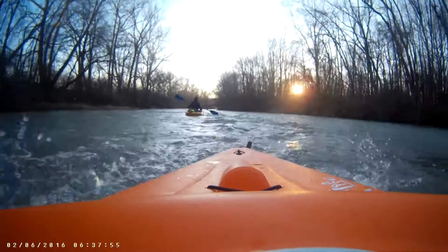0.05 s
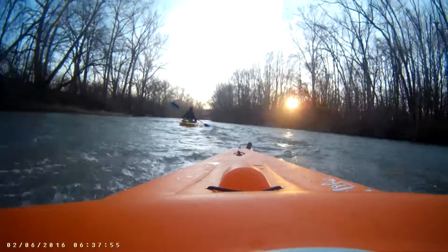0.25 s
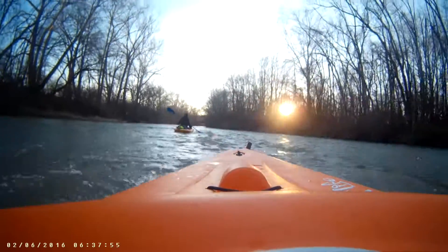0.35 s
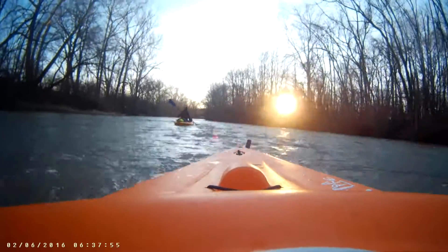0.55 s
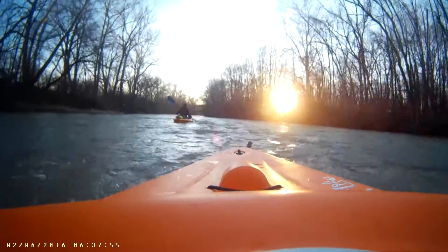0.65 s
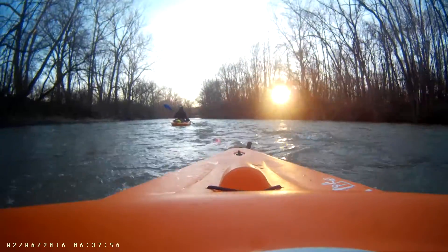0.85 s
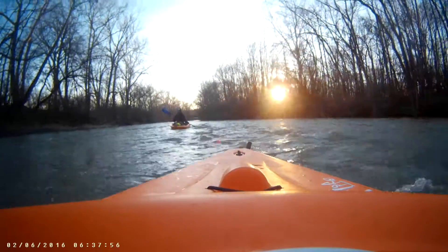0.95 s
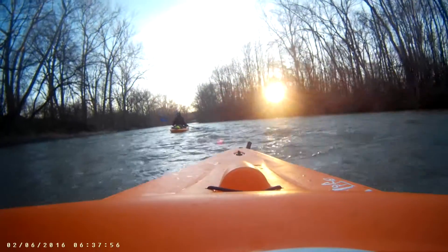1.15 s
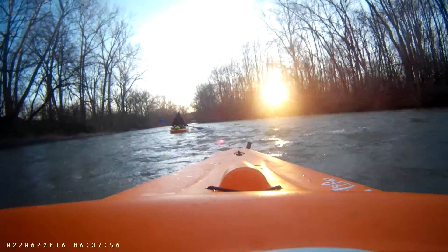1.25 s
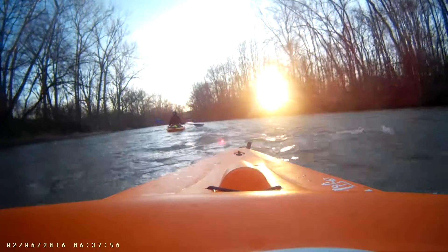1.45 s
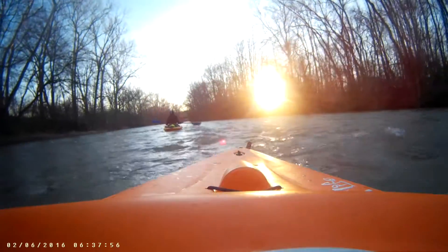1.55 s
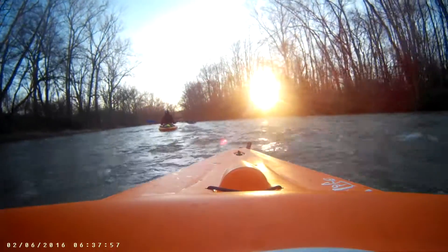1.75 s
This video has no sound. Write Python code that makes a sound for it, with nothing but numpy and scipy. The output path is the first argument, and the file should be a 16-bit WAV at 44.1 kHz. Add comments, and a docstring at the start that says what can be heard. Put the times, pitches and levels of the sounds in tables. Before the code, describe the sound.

A plastic kayak hull knocks and cracks against rocks in a shallow river. Water washes up the bow first, spray taps close to the deck microphone, then small bubbly laps follow over low wind rumble.

```python
"""Kayak in a shallow rapid

A plastic kayak runs a rapid, heard from a camera on its deck. A wave washes up the bow, the hull
knocks, cracks and shudders on rocks, and spray taps on the camera case. Then the water calms to
a few small, bubbly laps, over low wind and a faint electrical whine."""
import sys
import numpy as np
from scipy import signal
from scipy.fft import rfft, irfft, next_fast_len
from scipy.io import wavfile
from scipy.ndimage import map_coordinates

SR = 44100
rng = np.random.default_rng(int(sys.argv[2]) if len(sys.argv) > 2 else 0)


def wav_out(sig):
    """Save sig, one row per channel (or a flat mono array), as 16-bit PCM at SR to the path in sys.argv[1]."""
    wavfile.write(sys.argv[1], SR, np.round(np.clip(np.atleast_2d(sig).T, -1, 1) * 32767).astype(np.int16))


N = 79380
T = np.arange(N) / SR


def amp(db):
    """Turn decibels into a gain."""
    return 10 ** (np.asarray(db) / 20)


def unit(x):
    """Scale a signal to an average strength (rms) of 1."""
    return x / np.sqrt(np.mean(x ** 2) + 1e-20)


def level(rows):
    """Join (t/s, level/dB) points into a gain for every sample."""
    return amp(np.interp(T, *np.transpose(rows)))


def wobble(rate):
    """A smooth curve through `rate` random points a second."""
    return map_coordinates(rng.standard_normal(N), [T * rate])


def response(tone, cutoff_hz=1e6, order=2, size=8192):
    """A click shaped by a tone table (how strong each frequency is), dulled above the cutoff."""
    hz = np.fft.rfftfreq(size, 1 / SR)
    tone_hz, tone_db = np.transpose(tone)
    gain = amp(np.interp(np.log(hz + 1), np.log(tone_hz), tone_db))
    gain /= np.sqrt(1 + (hz / cutoff_hz) ** (2 * order))
    # minimum phase: all the ringing comes after the click
    cepstrum = irfft(np.log(gain + 1e-6))
    cepstrum[1:size // 2] *= 2
    cepstrum[size // 2 + 1:] = 0
    return irfft(np.exp(rfft(cepstrum)))


def shaped(x, tone):
    """Filter x with a tone table, at strength 1."""
    lead_in = SR // 4
    filtered = signal.fftconvolve(np.pad(x, (lead_in, 0), "wrap"), response(tone))
    return unit(filtered[lead_in:][:N])


def noise(tone):
    """Steady noise with the given tone."""
    return shaped(rng.standard_normal(N), tone)


def add(out, start_s, x):
    """Mix x into out at a given time."""
    part = out[max(0, round(start_s * SR)):][:len(x)]
    part += x[:len(part)]


# tone of the hiss (f/Hz, level/dB)
HISS_TONE = [(100, 6.5), (8000, 5), (14000, 7), (16000, -31.5)]
# loudness of the whine, dipping during the blows (t/s, level/dB)
WHINE_LEVELS = [(0, -68.5), (.35, -64), (.38, -79), (.65, -66), (.95, -68.5), (1.2, -80), (1.8, -77)]
def hiss_and_whine(hiss_db=-69.5, whine_hz=9519, flutter_hz=36.4, flutter_rad=0.65):
    """Faint hiss and a thin electrical whine that flutters quickly."""
    flutter = flutter_rad * signal.square(2 * np.pi * flutter_hz * T)
    whine = unit(np.sin(2 * np.pi * whine_hz * T + flutter))
    return amp(hiss_db) * noise(HISS_TONE) + level(WHINE_LEVELS) * whine


# loudness of the wind and the swaying hull (t/s, level/dB)
WIND_LEVELS = [(0, -34), (.06, -43.5), (.16, -60), (.3, -32.5), (.42, -27), (.62, -27.5), (.85, -34),
               (1.0, -47.5), (1.2, -59), (1.39, -50), (1.45, -50), (1.6, -59.5), (1.8, -65)]
# tone of their rumble (f/Hz, level/dB)
WIND_TONE = [(10, -30.5), (24, 1.5), (44, 4.5), (70, -12), (200, -27.5), (900, -120)]
def wind():
    """The hull sways in the wind with a deep rumble."""
    return level(WIND_LEVELS) * noise(WIND_TONE)


# loudness of the hollow hull (t/s, level/dB)
BOOM_LEVELS = [(0, -38), (.13, -50), (.23, -31), (.34, -30), (.41, -29), (.52, -28), (.7, -39.5),
               (.88, -46), (.94, -35), (1.0, -52), (1.35, -66.5), (1.42, -50.5), (1.5, -63), (1.8, -68.5)]
# tone of the hollow hull (f/Hz, level/dB)
BOOM_TONE = [(60, -21.5), (105, -8), (132, -0.5), (185, -11), (250, -7.5), (400, -30.5), (2500, -120)]
# heaves of the hull (t/s, level/dB, length/s)
HULL_HEAVES = [(0.381, -14, 0.025), (0.408, -13, 0.025), (.473, -15, 0.0203), (0.7216, -18, 0.0233)]
def hollow_hull():
    """The hull booms like a drum and heaves under the blows, pulling in, then pushing out."""
    out = level(BOOM_LEVELS) * noise(BOOM_TONE)
    for start_s, db, length_s in HULL_HEAVES:
        progress = np.clip((T - start_s) / length_s, 0, 1)
        out -= amp(db) * np.sin(2 * np.pi * progress) * np.sin(np.pi * progress)
    return out


def churn(tone, rate, rush):
    """Tiny splashes, about `rate` a second, over a smooth rush of water."""
    splashes = (rng.random(N) < rate / SR) * rng.standard_normal(N)
    return shaped(unit(splashes) + rush * rng.standard_normal(N), tone)


# loudness of the foam (t/s, level/dB)
FOAM_LEVELS = [(0, -61), (.13, -63.5), (.45, -59), (.9, -70.5), (1.0, -61.5), (1.11, -65), (1.2, -77.5),
               (1.8, -81)]
# tone of the foam (f/Hz, level/dB)
FOAM_TONE = [(1500, -11), (4200, -3.5), (5500, -5), (7300, -5), (8500, -15.5), (15000, -15.5)]
def foam(flicker_db=1.9):
    """Foam makes a high, flickering fizz."""
    return level(FOAM_LEVELS) * amp(flicker_db * wobble(140)) * churn(FOAM_TONE, rate=5000, rush=3.0)


# loudness of the rushing water (t/s, level/dB)
WASH_LEVELS = [(0, -37), (.062, -31.5), (.115, -44.5), (.123, -38.5), (.185, -35), (.232, -23.5),
               (.275, -27.5), (.4, -33.5), (.5, -28), (.6, -33.5), (.72, -39.5), (.92, -38.5), (.99, -51.5),
               (1.19, -64.5), (1.3, -53.5), (1.48, -63), (1.8, -61)]
# tone of the wash and the laps (f/Hz, level/dB)
WATER_TONE = [(90, -27.5), (250, -7.5), (320, -5), (430, 5), (560, -1), (800, -9.5), (950, 1.5),
              (1050, -14.5), (1230, -2.5), (1420, -1), (1690, 1), (2100, -19), (2550, -21), (3000, -32),
              (3600, -23), (4100, -26.5), (4500, -64), (15000, -76)]
def wash(surge_db=1.5):
    """Water rushes along the hull in uneven surges."""
    return level(WASH_LEVELS) * amp(surge_db * wobble(69.6)) * churn(WATER_TONE, rate=2200, rush=0.96)


def bubble_cloud(hz, middle_s, spread=0.056, cycles=46, rise=0.032, reach_s=0.09, count=40):
    """Bubbles near one pitch and one moment; each rings briefly and rises a little as it fades."""
    out = np.zeros(N + SR)
    for k, (shift, size, tune) in enumerate(rng.random((count, 3))):
        pitch = hz * np.exp(2 * spread * (2 * tune - 1))
        age = T[:int(SR * cycles / pitch)] * pitch / cycles  # runs from 0 to 1
        ring = np.sin(2 * np.pi * cycles * age * (1 + rise * age))
        fade = amp(-40 * age) * (1 - np.exp(-age * cycles))
        start_s = middle_s + reach_s * (2 * (k + shift) / count - 1)
        add(out, start_s, (0.5 + size) * ring * fade)
    return out[:N] * np.sqrt(2 * reach_s * SR) / np.linalg.norm(out)


# small waves (loudest at t/s, level/dB, rise/s, fall/s, bubble f/Hz, bubbles over splash/dB)
BOW_LAPS = [(.123, -34, 0.0039, 0.021, 1490, 0.5), (.191, -30.5, 0.0048, 0.058, 1592, -0.5),
            (.881, -33.5, 0.00097, 0.034, 1280, -1), (1.04, -47, 0.022, 0.014, 419, 5.5),
            (1.094, -51, 0.039, 0.032, 328.3, 6.5), (1.321, -45.5, 0.003, 0.0096, 2080, 5),
            (1.332, -37.5, 0.01, 0.013, 1533, -0.5), (1.408, -61, 0.017, 0.012, 3590, 2.5),
            (1.414, -43.5, 0.011, 0.014, 2534, -3.5), (1.491, -51.5, .002, 0.0047, 3590, -5.5),
            (1.592, -53, 0.028, 0.029, 697, -9.5), (1.689, -55.5, 0.0065, 0.0078, 1680, 10.5),
            (1.701, -49, 0.0047, 0.0084, 1382, 9.5), (1.749, -47.5, 0.011, 0.019, 1654, -1),
            (1.799, -54.5, 0.0077, .01, 1365, 5)]
def laps():
    """Small waves slap the bow; each is a splash with bubbles that swells and fades."""
    out = np.zeros(N)
    for top_s, db, rise_s, fall_s, hz, bubble_db in BOW_LAPS:
        from_top = np.where(T < top_s, (top_s - T) / rise_s, (T - top_s) / fall_s)
        swell = np.exp(-from_top ** 1.31)
        splash = churn(WATER_TONE, rate=920, rush=0.73)
        out += amp(db) * swell * (splash + amp(bubble_db) * bubble_cloud(hz, top_s))
    return out


# loudness of the fine ticking (t/s, level/dB)
TICK_LEVELS = [(.26, -76), (.295, -48), (.34, -52.5), (.37, -31.5), (.41, -28.5), (.44, -61), (.46, -41),
               (.56, -59), (.8, -74)]
# tone of the ticks (f/Hz, level/dB)
TICK_TONE = [(800, 3), (2300, -1), (3700, -1), (4600, -11.5), (7200, -8.5), (8300, -13.5), (16000, -45)]
def ticking(rate=300, clump_db=4, clump_rate=130):
    """Fine spray and grit tick on the hull in clumps, loudest while it scrapes over rock."""
    chance, size = rng.random((2, N))
    ticks = (chance < rate / SR) * size * amp(clump_db * wobble(clump_rate))
    return level(TICK_LEVELS) * shaped(ticks, TICK_TONE)


def strike(tone, cutoff_hz, grit, grit_s, ring, ring_s, order=2, ring_hz=2000):
    """One hit: a push, a short gritty crunch and a duller ring. Harder hits have a higher cutoff."""
    t = T[:SR // 10]
    fades = amp(-60 * t / np.array([[grit_s], [ring_s]]))
    attack = 1 - np.exp(-t / 0.00077)
    crunch, tail = rng.standard_normal((2, len(t))) * fades * attack
    dull_tail = signal.lfilter(*signal.butter(2, ring_hz, fs=SR), tail / np.linalg.norm(tail))
    force = grit * crunch / np.linalg.norm(crunch) + ring * dull_tail
    force[0] += 1  # the push
    body = response(tone, cutoff_hz, order)
    hit = signal.fftconvolve(force, body)
    hit *= np.linalg.norm(body) / np.linalg.norm(hit) * np.sqrt(1 + grit ** 2 + ring ** 2)
    return hit / abs(body).max()  # peaks near 1


# drops landing (t/s, relative level/dB)
SPRAY_DROPS = [(0.2972, -42), (0.3023, -22), (0.3644, -5.5), (0.406, -6), (0.462, -14.5), (0.5144, -23),
               (0.5771, -21.5), (0.6409, -16), (0.6998, -18), (0.7396, -19), (0.7779, -18.5),
               (0.8177, -15.5), (.879, -30.5)]
# tone of the tapped case (f/Hz, level/dB)
DROP_TONE = [(100, -43), (900, -12.5), (1400, 8), (1900, -5.5), (2450, -6.5), (2950, -23), (3700, -1.5),
             (4200, -15), (4800, -36), (7000, -27.5), (9000, -55.5), (15000, -53)]
def spray_drops(gain_db=-1):
    """Drops of spray tap on the camera case."""
    out = np.zeros(N)
    for start_s, db in SPRAY_DROPS:
        tap = strike(DROP_TONE, cutoff_hz=9900, grit=0.74, grit_s=0.013, ring=0.68, ring_s=0.0084)
        add(out, start_s, amp(db + gain_db) * tap)
    return out


# spots that a blow sets ringing, from the wide floor to the stiff keel (t/s, level/dB, f/Hz)
RINGING_SPOTS = [(0.3745, -24.5, 7150), (.3835, -11.5, 271), (0.4094, -7, 129.6), (0.486, -16.5, 418),
                 (0.5092, -17.5, 130.4), (0.5388, -13.5, 2420), (.8228, -19, 1990)]
def shell_rings(fade_at_1khz_s=0.027, shortening=0.63):
    """The plastic rings briefly: low notes thump, high ones ping and die sooner."""
    out, t = np.zeros(N), T[:SR // 4]
    for start_s, db, hz in RINGING_SPOTS:
        fade_s = fade_at_1khz_s * (1000 / hz) ** shortening  # time to fall 60 dB
        phase = 2 * np.pi * hz * t
        add(out, start_s, -amp(db - 60 * t / fade_s) * np.sin(phase) * (1 - np.exp(-phase)))
    return out


# sharp cracks (t/s, relative level/dB, cutoff f/Hz)
STONE_CRACKS = [(0.3669, -17.5, 7000), (0.3743, -19.5, 4970), (0.3811, -18, 6070), (0.394, -12, 6350),
                (0.4083, -10.5, 5980), (0.4143, -2.5, 8050), (.4166, 2, 9000), (0.4173, -13.5, 12130),
                (0.4228, -12, 8000), (0.458, -19.5, 6510), (0.4734, -7, 7000), (0.4819, -20, 6000),
                (0.5313, -16, 4300), (0.5362, -17.5, 6430), (0.539, -7.5, 6640), (0.557, -30, 7000),
                (0.6371, -14, 4970), (0.6444, -12.5, 5900), (.8225, -21, 3930), (1.3273, -32, 3220)]
# tone of stone on plastic (f/Hz, level/dB)
CRACK_TONE = [(100, -53.5), (700, -3), (1080, -10.5), (1350, 5), (1900, -5), (2450, -2.5), (3000, -12),
              (3700, -7.5), (4600, -16), (6100, -7), (6600, -13.5), (7300, -3.5), (8000, -17.5),
              (9200, -9.5), (15000, -13.5)]
def stone_cracks(gain_db=-2):
    """Stone bites into the plastic with bright, gritty cracks."""
    out = np.zeros(N)
    for start_s, db, cutoff_hz in STONE_CRACKS:
        crack = strike(CRACK_TONE, cutoff_hz, grit=1.0, grit_s=0.0086, ring=0.78, ring_s=0.027, order=3)
        add(out, start_s, amp(db + gain_db) * crack)
    return out


# dull knocks (t/s, relative level/dB, cutoff f/Hz)
HULL_KNOCKS = [(.3562, -15, 1190), (0.3588, -4.5, 903), (0.3606, 0, 1102), (0.3646, -5, 1970),
               (0.3737, -9, 1574), (0.3813, -9, 1946), (0.3843, -2, 1700), (.3885, -10.5, 1330),
               (.3965, -8.5, 1830), (0.4069, -4, 1470), (.4145, -6.5, 1200), (.4174, 0, 2000),
               (0.483, -9, 2600), (.491, -13, 1600), (.674, -22, 2600), (.767, -25, 2600),
               (0.7929, -20, 3500), (0.7956, -28, 3520), (.8225, -14, 2250)]
# tone of the knocked hull (f/Hz, level/dB)
KNOCK_TONE = [(60, -28), (280, -2), (580, -0.5), (800, -5.5), (950, 1), (1060, -11.5), (1250, 7.5),
              (1600, 2), (2000, 1), (2800, -25.5), (3700, -6), (5000, -40.5), (15000, -63.5)]
def hull_knocks(gain_db=-2):
    """The hull bumps over rocks with dull knocks."""
    out = np.zeros(N)
    for start_s, db, cutoff_hz in HULL_KNOCKS:
        knock = strike(KNOCK_TONE, cutoff_hz, grit=0.55, grit_s=0.012, ring=0.56, ring_s=0.037)
        add(out, start_s, amp(db + gain_db) * knock)
    return out


def scene():
    """Everything as it reaches the deck, in one channel."""
    hits = hull_knocks() + stone_cracks() + spray_drops() + shell_rings() + ticking()
    rumble = wind() + hollow_hull()
    water = wash() + foam() + laps()
    return (hits + rumble + water + hiss_and_whine())[None]


def record(dry, ceiling=0.68, top_hz=15880):
    """The loudest blows overload the microphone, and the very highest treble is cut off."""
    squashed = dry / (1 + abs(dry / ceiling) ** 6) ** (1 / 6)
    size = next_fast_len(N + SR // 2)
    kept = np.fft.rfftfreq(size, 1 / SR) < top_hz
    return irfft(rfft(squashed, size) * kept, size)[..., :N]


dry = scene()
out = record(dry)
wav_out(out)
```